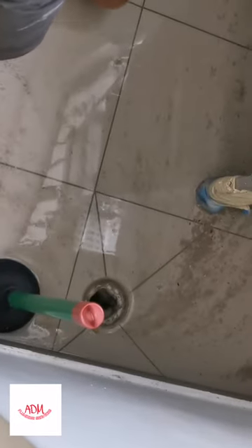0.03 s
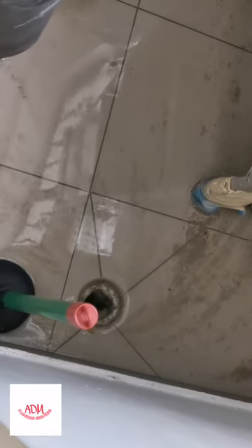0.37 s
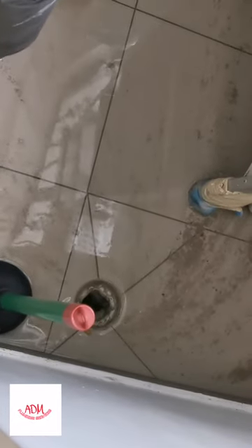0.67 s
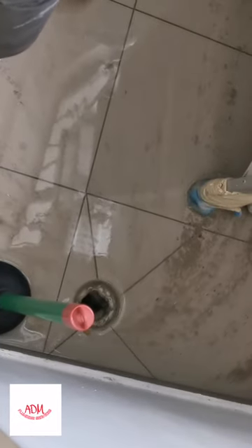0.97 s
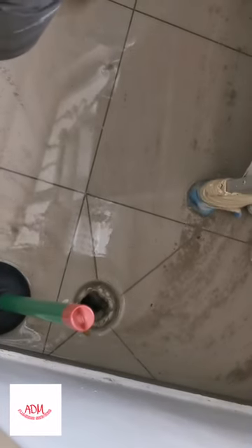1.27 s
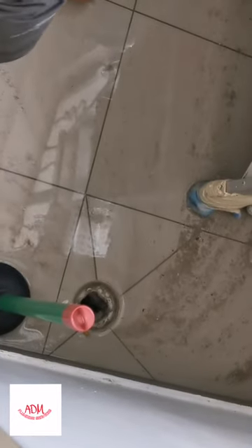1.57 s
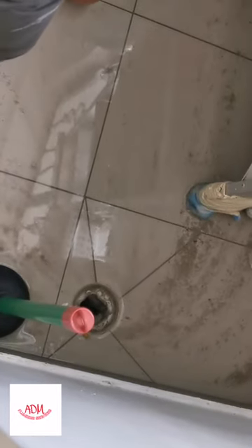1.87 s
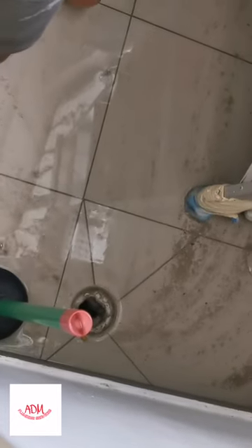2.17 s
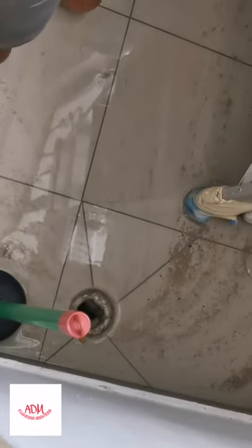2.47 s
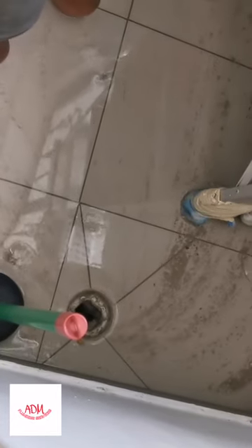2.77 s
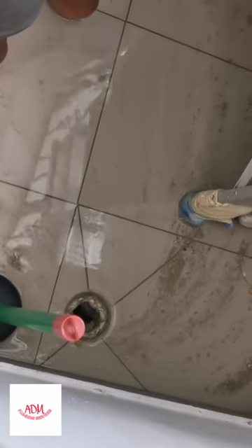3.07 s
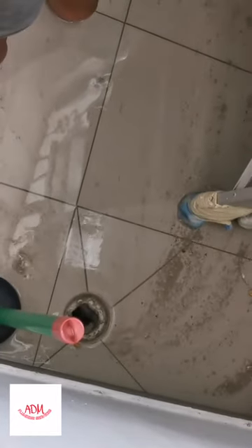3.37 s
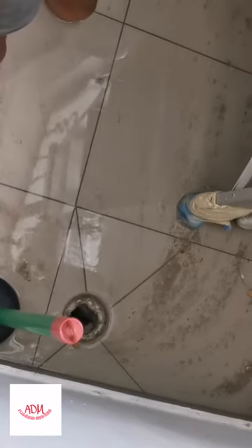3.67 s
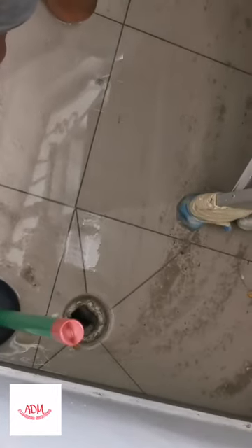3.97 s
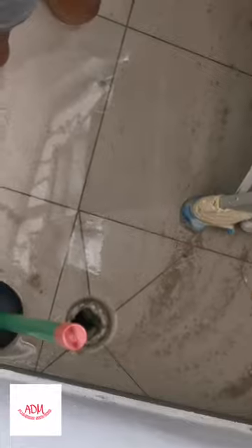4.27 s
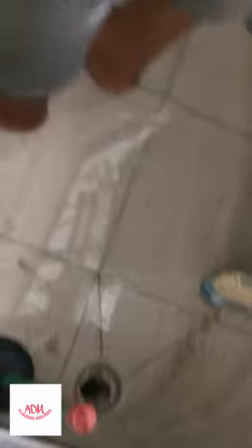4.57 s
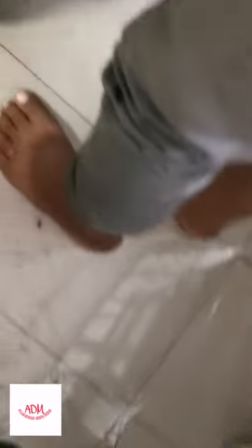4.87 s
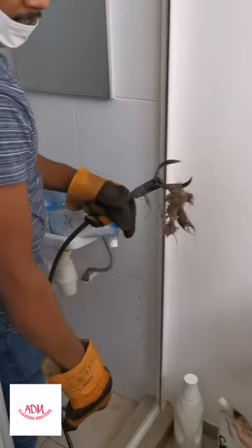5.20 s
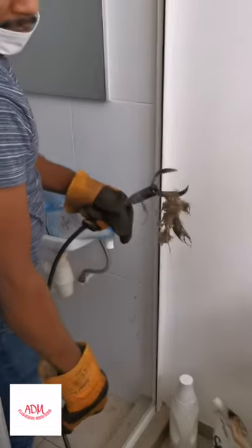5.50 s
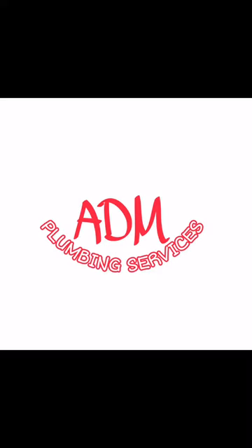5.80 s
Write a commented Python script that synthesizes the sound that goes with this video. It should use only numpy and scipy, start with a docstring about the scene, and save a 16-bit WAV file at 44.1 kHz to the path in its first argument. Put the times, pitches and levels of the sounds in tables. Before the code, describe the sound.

Rough, hollow grinding with rattles, thumps and metallic clinks from a cable turning in a bathroom drain, ending abruptly in a pop.

```python
"""A rough grinding with hard chatter: a drain cleaning machine spins its steel cable in a waste pipe.
Friction on most turns and impacts on the wall excite the pipe's resonances as rubs, rattles and thumps.
The coils scrape, clink, squeak and scuff in a small tiled bathroom, over a motor's drone, rumble and hiss.
The sound cuts off dead just after a pop; after a silence, a moment of quiet room ends on a second pop."""
import sys
import numpy as np
from scipy import signal
from scipy.fft import rfft, irfft
from scipy.io import wavfile

SR = 44100
rng = np.random.default_rng(int(sys.argv[2]) if len(sys.argv) > 2 else 0)


def materialize(psi):
    """Save the field psi as 16-bit PCM at rate SR to the path in sys.argv[1].

    A 1-D psi becomes a single channel; in a 2-D psi each row is a channel.
    """
    bounded = np.clip(np.atleast_2d(psi).T, -1, 1)
    quanta = np.round(bounded * 32767).astype(np.int16)
    wavfile.write(sys.argv[1], SR, quanta)


N = 261954
TIME = np.arange(N) / SR
FREQS = np.fft.rfftfreq(N, 1 / SR)

# hard impacts of the cable on the pipe wall: peak t/s, relative level/dB, f/Hz, length/s
WALL_IMPACTS = [(0.061, -24.5, 608, 0.018), (0.092, -25.5, 572, 0.014), (0.145, -20, 620, 0.012),
                (0.199, -12.5, 630, 0.0088), (0.239, -19.5, 580, 0.007), (0.284, -15.5, 610, 0.0049),
                (0.326, -15, 616, 0.01), (0.375, -14.5, 594, 0.0062), (0.41, -26, 615, 0.0053),
                (0.461, -18, 583, 0.0068), (0.499, -23, 610, 0.014), (0.529, -22.5, 644, 0.0034),
                (0.56, -17, 614, 0.008), (0.588, -15.5, 602, 0.0087), (0.617, -18, 606, 0.0053),
                (0.632, -20.5, 560, 0.0064), (0.676, -16.5, 610, 0.01), (0.684, -25.5, 995, 0.01),
                (0.73, -12.5, 627, 0.01), (0.781, -19.5, 597, .005), (0.811, -26.5, 593, 0.0055),
                (0.987, -23.5, 580, 0.0082), (1.089, -19, 610, 0.0084), (1.232, -21.5, 555, 0.01),
                (1.316, -23.5, 565, 0.011), (1.417, -21, 613, 0.012), (1.457, -17, 564, 0.004),
                (1.493, -19.5, 593, 0.011), (1.529, -21.5, 583, 0.0072), (1.555, -22, 613, 0.02),
                (1.629, -14, 603, 0.01), (1.663, -17, 602, 0.017), (1.696, -20, 593, 0.013),
                (1.814, -19, 595, 0.0096), (1.85, -20.5, 610, 0.015), (1.998, -17.5, 607, 0.019),
                (2.022, -18, 592, 0.0087), (2.082, -19, 625, 0.014), (2.111, -19.5, 623, 0.0042),
                (2.147, -21.5, 633, 0.016), (2.168, -20.5, 614, 0.0046), (2.202, -22.5, 586, 0.021),
                (2.325, -17, 615, 0.007), (2.37, -22.5, 612, 0.014), (2.425, -19.5, 600, 0.0035),
                (2.491, -21.5, 616, 0.016), (2.552, -22, 576, 0.0098), (2.589, -23.5, 604, 0.0088),
                (2.64, -31.5, 612, 0.02), (2.694, -21, 620, .005), (2.771, -24.5, 594, 0.012),
                (2.812, -18, 617, 0.01), (2.853, -18, 633, 0.012), (2.878, -21, 600, .005),
                (2.934, -14, 585, 0.0065), (3, -22, 646, 0.014), (3.147, -18, 619, 0.011),
                (3.172, -28, 965, 0.0086), (3.221, -21.5, 578, 0.013), (3.286, -21, 611, 0.014),
                (3.331, -15, 630, 0.026), (3.353, -28.5, 985, 0.015), (3.502, -21.5, 612, 0.017),
                (3.522, -28, 910, 0.0076), (3.528, -20, 610, 0.005), (3.554, -20, 635, 0.0062),
                (3.57, -25, 720, 0.0057), (3.73, -26, 970, 0.0067), (3.733, -22, 610, 0.0058),
                (3.834, -24.5, 637, 0.0084), (3.895, -32, 974, 0.018), (3.921, -18.5, 593, 0.0085),
                (3.947, -24, 590, 0.0095), (3.983, -20, 600, 0.0088), (4.061, -19.5, 597, 0.0093),
                (4.204, -24.5, 600, 0.022), (4.265, -17.5, 613, 0.0087), (4.293, -20, 589, 0.0043),
                (4.375, -31.5, 625, 0.013), (4.39, -26.5, 961, 0.013), (4.414, -22.5, 640, 0.0083),
                (4.518, -27, 996, 0.0081), (4.582, -24, 591, 0.018), (4.702, -31.5, 1047, 0.016),
                (4.751, -24, 754, 0.0064), (4.782, -27.5, 1037, 0.018), (4.822, -26, 608, .01),
                (4.842, -22.5, 589, .006)]
# spectrum of scraping steel: f/Hz, relative level/dB
SCRAPE_SPECTRUM = [(100, -20), (300, -8), (500, 5), (850, 5.5), (1220, -4), (1450, -0.9), (2100, -2.5),
                   (2650, -5.5), (3000, -6.8), (3550, -14.5), (4300, -16.5), (5100, -22.5), (6800, -27.5),
                   (15000, -30.5)]
# the two stretches that sound: start t/s, end t/s
AUDIBLE_SPANS = [(0, 5.0797), (5.592, 5.7903)]


def grinding():
    """Forced vibration: grains of friction drive the pipe's modes, deep down and near its mouth."""
    # resonances of the pipe: f/Hz, bandwidth/Hz, relative level/dB
    pipe_modes = [(123, 4.4, -19.5), (132.5, 2.9, -14.5), (181.6, 4.4, -25.5), (229.8, 6.7, -1),
                  (298, 20, -3.5), (368, 4.8, -1.5), (464.5, 37.7, 6), (580, 68, 4.5), (592, 3.1, -5),
                  (622, 42, 8), (711, 28, 5.5), (780, 90, -42.5), (930.2, 12, 6), (999, 20, 5.5),
                  (954, 34, -1), (1364, 140, -7)]
    drag, _, deep_rub, mouth_rub = friction()
    # the pipe lets little treble out; from far down only its low modes arrive
    pipe = ringing(pipe_modes) / (1 + (FREQS / 1700) ** 6)
    low = 1 / (1 + (FREQS / 670) ** 16)
    deep = shape(grains(per_s=4000, spread_db=-2), pipe * low)
    deep *= np.hypot(drag, deep_rub) * amp(wander(42))
    mouth = shape(grains(per_s=4000, spread_db=-.6), pipe * (1 - low))
    mouth *= np.hypot(amp(-6) * drag, mouth_rub) * amp(.25 * wander(33))
    return contact() * deep + mouth


def friction():
    """Friction follows normal force: envelopes of steady drag and of rubs, about six a second."""
    # steady drag: t/s, level in the pipe/dB, level at the open coils/dB
    drag_levels = [(0, -28.5, -33), (.7, -34.5, -34.5), (.85, -37, -34), (1.3, -29, -32), (2.0, -28.5, -33),
                   (2.9, -27.5, -32.5), (3.15, -32.5, -35), (3.45, -45, -35.5), (3.6, -33, -37.5),
                   (4.05, -29, -35.5), (4.6, -28.5, -35), (5.0, -31, -35), (5.08, -42, -39.5)]
    # the cable leans on the wall: peak t/s, level deep down/dB, level at the mouth/dB, length/s
    rubs = [(0.048, -26.5, -26.5, 0.008), (0.216, -21.5, -29, 0.038), (0.395, -31, -25.5, 0.022),
            (0.557, -27.5, -28, 0.073), (0.71, -23.5, -30.5, 0.057), (0.933, -25, -32.5, 0.039),
            (1.083, -23, -33.5, 0.029), (1.3, -35.5, -31.5, 0.04), (1.444, -27, -31, 0.086),
            (1.638, -24.5, -26.5, 0.0099), (1.828, -35.5, -32, 0.049), (1.977, -22, -26, 0.028),
            (2.12, -26.5, -31, 0.099), (2.36, -33.5, -27.5, 0.069), (2.606, -16, -26, 0.012),
            (2.671, -20, -26, 0.029), (2.83, -30, -29.5, 0.038), (3.003, -23, -28, 0.052),
            (3.155, -21.5, -32, 0.025), (3.3, -21.5, -30, 0.082), (3.535, -23, -28, 0.069),
            (3.703, -47, -30, 0.12), (3.914, -20.5, -30.5, 0.043), (3.959, -23.5, -24, 0.029),
            (4.13, -61, -31.5, 0.072), (4.35, -24, -31.5, 0.075), (4.404, -34, -30.5, 0.054),
            (4.53, -35, -29.5, 0.072), (4.748, -22, -27.5, 0.065), (4.829, -23, -36.5, 0.026),
            (4.985, -35, -29.5, 0.048)]
    times, *levels = np.transpose(drag_levels)
    drag, scrape = (amp(np.interp(TIME, times, level)) for level in levels)
    power = sum((amp([[deep_db], [mouth_db]]) * swell(TIME[::16] - s, length, length)) ** 2
                for s, deep_db, mouth_db, length in rubs)
    deep_rub, mouth_rub = np.sqrt(power).repeat(16, axis=1)[:, :N]
    return drag, scrape, deep_rub, mouth_rub


def contact():
    """Rebound unloads the wall: a gain that dips around each hard impact."""
    bounce_db = -4
    bouncing = sum(np.exp(-((TIME[::16] - s) / (2 * length)) ** 2) for s, _, _, length in WALL_IMPACTS)
    return amp(bounce_db * np.minimum(bouncing, 1)).repeat(16)[:N]


def scraping():
    """Sliding friction: coils in the open radiate broadband grit and twangs, louder at each rub."""
    _, scrape, _, mouth_rub = friction()
    grit = shape(grains(per_s=14000, spread_db=1.25), amp(read(SCRAPE_SPECTRUM)))
    coils = grit + amp(-12) * twangs()
    coils *= np.hypot(scrape, amp(-8) * mouth_rub) * amp(1.3 * wander(30))
    return bathroom(coils, wet_db=-6, t60=.19)


def twangs():
    """Free vibration: single turns of the coil catch and ring for an instant; the higher, the fainter."""
    middle_hz, spread_octaves, db_per_octave, spread_db, length_s = 1700, .25, -5, 1.2, .005
    rows = []
    for s, strength, pitch in scattered(count=440):
        octaves = spread_octaves * pitch
        rows.append((s, spread_db * strength + db_per_octave * octaves, middle_hz * 2 ** octaves, length_s))
    return unit(bursts(rows, attack=.4, rough=.15, lead=1.2))


def rattles():
    """Impact excitation: hard and light hits sound near the pipe's strongest resonance, with grit."""
    # light chatter between the hard impacts: t/s, relative level/dB
    chatter_levels = [(0, -30), (.6, -28), (.88, -29), (1.3, -28), (2.7, -28), (3.2, -30), (3.75, -32),
                      (4.3, -32), (5.0, -34)]
    mean_hz, spread_hz, spread_db, length_s = 607, 23, 2.5, .01
    light = [(s, np.interp(s, *np.transpose(chatter_levels)) + spread_db * strength,
              mean_hz + spread_hz * pitch, length_s) for s, strength, pitch in scattered(count=72)]
    knocks = amp(-1) * bursts(WALL_IMPACTS, attack=.8, rough=.14, lead=.4)
    chatter = contact() * bursts(light, attack=.65, rough=.3, lead=.4)
    grit = amp(-24.5) * noise(SCRAPE_SPECTRUM) * force(WALL_IMPACTS + light, rise=.006, fall=.012)
    return bathroom(knocks + chatter + grit, wet_db=-12.5, t60=.3)


def thumps():
    """Superposition: the whipping cable drives several pipe modes at once, which beat and ring on."""
    # dull blows: peak t/s, relative level/dB, tilt toward the upper modes/dB, length/s
    blows = [(0.242, -28, 1, 0.017), (0.629, -36.5, -6, 0.016), (1.123, -29.5, 4, 0.018),
             (1.465, -19, 2.5, 0.011), (1.528, -31, -2, 0.0076), (1.816, -21, 0, .013),
             (1.909, -22, 0.5, 0.009), (2.006, -27.5, -6, 0.0092), (2.162, -26.5, -2.5, .012),
             (2.345, -21.5, 4, 0.017), (2.511, -24, 2, 0.015), (2.61, -32, -6.5, 0.012),
             (2.86, -18.5, 2, 0.0077), (2.948, -27.5, -2.5, 0.012), (3.111, -22.5, 0.5, 0.0083),
             (3.548, -24, 6, 0.014), (4.244, -24.5, 1.5, .013), (4.394, -36.5, -9, .012),
             (4.948, -32, -2.5, 0.015)]
    # pipe modes that a blow drives: f/Hz, bandwidth/Hz, relative level/dB
    boom_modes = [(222, 7, -1), (282, 20, -2), (373, 16, -12), (455, 23, -10), (1030, 32, -13)]
    driven = [(s, db + mode_db + (tilt_db if k else -tilt_db) + rng.standard_normal(), hz, length)
              for s, db, tilt_db, length in blows for k, (hz, _, mode_db) in enumerate(boom_modes)]
    thud = bursts(driven, attack=1.4, rough=.25, lead=.05)
    ring = struck(blows, boom_modes, lag=.012, vary_db=2, detune=.015)
    return amp(-4.5) * thud + amp(-6.5) * ring


def clinks():
    """Brief contact excites high modes: coils strike metal with a ping, clack, ring and bright splash."""
    # strikes, at relative levels: peak t/s, level/dB, ping f/Hz, splash level/dB, ping length/s
    strikes = [(0.186, -36, 2870, -62.5, 0.0046), (0.376, -37, 3350, -65.5, 0.0044),
               (0.498, -41, 3030, -64.5, 0.0098), (0.532, -42.5, 3030, -58, .004),
               (0.55, -41.5, 3350, -69, 0.0044), (0.614, -32.5, 2930, -50, 0.0036),
               (0.671, -31, 3280, -46.5, 0.0047), (1.316, -36.5, 3000, -48.5, .005),
               (1.377, -39, 2980, -60, .006), (1.453, -39.5, 2895, -65, 0.0043),
               (1.491, -38.5, 2980, -47.5, .005), (1.55, -37, 2940, -49, 0.0044),
               (1.838, -39, 3300, -58, 0.0085), (2.013, -33, 3290, -44, 0.0084),
               (2.071, -34, 3360, -47.5, 0.0064), (2.138, -41, 3370, -63, .004),
               (2.165, -36, 2920, -60, 0.0028), (2.184, -37.5, 3200, -53, .004),
               (2.317, -39.5, 2760, -49, .004), (2.363, -36.5, 3270, -45, 0.008),
               (2.413, -42.5, 3015, -66, .004), (2.528, -36, 3330, -52, 0.003),
               (2.59, -39, 2800, -57, 0.005), (2.646, -43, 3320, -47.5, 0.0049),
               (2.695, -36, 2970, -53.5, .005), (2.761, -35, 3000, -58, .007),
               (2.872, -35.5, 2960, -53.5, 0.0037), (2.93, -34.5, 2820, -60.5, .006),
               (2.989, -40, 3460, -50, 0.0059), (3.276, -36.5, 2760, -55.5, 0.0061),
               (3.543, -35.5, 2830, -48, 0.0055), (3.575, -35.5, 3020, -52, 0.0038),
               (3.665, -37.5, 3320, -47.5, 0.0037), (3.908, -36, 2810, -67, .005),
               (3.948, -28.5, 3310, -38.5, .005), (4.337, -29.5, 3270, -44.5, 0.0072),
               (4.368, -35, 3000, -49, .004), (4.411, -37.5, 2830, -50.5, 0.012),
               (4.854, -44, 2790, -71, .005), (5.004, -43.5, 3120, -55, 0.0031)]
    # modes of the steel coil: f/Hz, bandwidth/Hz, relative level/dB
    steel_modes = [(2090, 60, -5), (2853, 45, 0), (2990, 50, -2), (3285, 40, 0), (3375, 36, -3),
                   (3690, 45, -11), (3950, 55, -10), (4603, 80, -17), (5500, 90, -17)]
    # spectrum of the dry clack: f/Hz, relative level/dB
    clack_spectrum = [(1000, -10), (1900, 1), (2550, -4), (2800, 2), (3020, 3), (3150, -6), (3270, 4),
                      (3400, 2), (3540, -9), (3950, -5.5), (4400, -13), (5000, -30), (9000, -41)]
    # spectrum of the bright splash: f/Hz, relative level/dB
    splash_spectrum = [(1500, -23.5), (3000, 10.5), (4200, 2), (5100, -7), (6800, -6), (10500, -8),
                       (15000, -20.5)]
    # faint strikes are added all along
    rows = strikes + [(s, -43 + 2 * strength, 3080 + 190 * pitch, -65 + 2 * strength, .004)
                      for s, strength, pitch in scattered(count=40)]
    ping = bursts([(s, db, hz, length) for s, db, hz, _, length in rows], attack=.3, rough=.2, lead=1.2)
    clack = noise(clack_spectrum) * force(rows, rise=.002, fall=.009)
    ring = struck(rows, steel_modes, lag=.002, vary_db=4, detune=.008)
    splash = noise(splash_spectrum) * force([(s, db) for s, _, _, db, _ in rows], rise=.004, fall=.018)
    direct = amp(-2) * ping + amp(.5) * clack + amp(-4.5) * ring + amp(8) * splash
    return bathroom(direct, wet_db=-7, t60=.35)


def squeaks():
    """Stick-slip: steel catches on steel, and one mode of the coil sings briefly."""
    # slips: peak t/s, level/dB, f/Hz, length/s
    slips = [(1.12, -43, 2550, .012), (3.025, -45, 3390, .018), (3.165, -41.5, 2853, .025),
             (3.338, -38.5, 2853, .02)]
    return bursts(slips, attack=.9, rough=.15, lead=.8)


def scuffs():
    """Friction noise: coils slide over a hard edge in a bright scrape that catches and trails off."""
    # slides: peak t/s, relative level/dB, decay time/s
    slides = [(4.14, -53, .018), (4.59, -52, .018), (4.693, -48, .01), (4.746, -39.5, .016),
              (4.78, -46.5, .02), (4.965, -48.5, .012), (5.0, -49, .016)]
    # spectrum of steel on the edge: f/Hz, relative level/dB
    edge_spectrum = [(2000, -14.5), (2870, 12.5), (3250, 2.5), (4200, 6.5), (4900, -6.5), (5600, 2),
                     (6400, -8), (9000, -20), (15000, -26)]
    envelope = sum(amp(db) * swell(TIME - s, .006, decay) for s, db, decay in slides)
    grit = shape(grains(per_s=11000, spread_db=0), amp(read(edge_spectrum)))
    return bathroom(amp(5) * grit * envelope, wet_db=-13, t60=.21)


def pops():
    """Damped oscillation: a sudden push of air, mainly at the right microphone, swings back and dies."""
    # pressure pulses: t/s, level/dB, period/s, decay time/s, left relative to right/dB
    pulses = [(5.046, -2.5, 0.013, 0.0063, -14), (5.7805, -4.5, 0.02, 0.0043, -17)]
    out = np.zeros((2, N))
    for s, db, period, decay, left_db in pulses:
        t = np.maximum(TIME - s, 0)
        front = 1 - np.exp(-(t / .00024) ** 2)
        push = np.exp(-t / decay) * np.cos(2 * np.pi * t / period + .73)
        snap = 1.27 * np.exp(-t / .00022)
        out += amp(db) * front * np.array([amp(left_db) * push, push + snap])
    return out


def motor():
    """Modulation: the motor's drone wavers in pitch, grows under load and judders as the load shifts."""
    # drone under load: t/s, level/dB
    load_levels = [(0, -55.5), (1.0, -55.5), (1.45, -48), (1.6, -42.5), (2.0, -45), (2.33, -42),
                   (2.45, -58), (3.2, -55.5), (5.08, -57)]
    drone_hz = 147
    cycles = np.cumsum(drone_hz * (1 + .04 * wander(8.5))) / SR
    judder = .7 + .7 * wander(16) + .25 * wander(60)
    load = amp(np.interp(TIME, *np.transpose(load_levels)))
    return np.sqrt(2) * np.sin(2 * np.pi * cycles) * judder * load


def rumble_and_hiss():
    """Band-limited noise: a slowly swelling rumble and a thin, nearly steady hiss."""
    # course of the rumble: t/s, level/dB
    rumble_levels = [(0, -41.5), (.9, -45), (1.4, -37.5), (2.2, -45.5), (2.8, -36.5), (3.4, -43),
                     (4.2, -42), (5.08, -38.5)]
    # spectrum of the rumble: f/Hz, relative level/dB
    rumble_spectrum = [(10, -14), (25, -10), (40, -4), (70, -3.5), (95, -20.5), (200, 3), (500, -3),
                       (2000, -74.5)]
    # spectrum of the hiss: f/Hz, relative level/dB
    hiss_spectrum = [(7700, -31.5), (8700, -7.5), (10000, 5.5), (10800, 11), (11600, 0), (13300, -6.5),
                     (14100, -15), (15000, -10)]
    rumble = amp(np.interp(TIME, *np.transpose(rumble_levels))) * noise(rumble_spectrum)
    hiss = amp(-51 + wander(22.3)) * noise(hiss_spectrum)
    return rumble + hiss


def quiet_room():
    """Ambient noise floor: faint, steady and mostly bass."""
    # spectrum of the room: f/Hz, relative level/dB
    room_spectrum = [(10, 4), (40, 1), (170, -2), (300, -12), (600, -16.5), (1000, -14.5), (1500, -21),
                     (3000, -28), (4100, -44), (5500, -41), (7500, -60), (10500, -41), (13000, -48),
                     (15000, -52)]
    return amp(-45) * noise(room_spectrum)


def bathroom(x, wet_db, t60):
    """Reverberation: dense reflections from tiled walls fall by 60 dB in t60 seconds."""
    taps = rng.standard_normal((2, N)) * (rng.random((2, N)) < 3000 / SR)
    tail = pair(taps * amp(-60 * TIME / t60) * (TIME > .005))[:, :SR // 2]
    tail /= np.linalg.norm(tail, axis=1, keepdims=True)
    return x + amp(wet_db) * signal.fftconvolve(x, tail, axes=1)[:, :N]


def bursts(rows, attack, rough, lead):
    """Driven resonance: each contact pumps a short tone; the left channel leads by `lead` radians."""
    out = np.zeros(N, complex)
    for s, db, hz, length in rows:
        near = slice(max(int((s - 3 * length) * SR), 0), int((s + 8 * length) * SR))
        t = TIME[near] - s
        out[near] += amp(db) * swell(t, attack * length, length) * np.exp(2j * np.pi * hz * t)
    out *= 1 + rough * (wander(140) + 1j * wander(140))
    # the contact point slides, so the phase drifts
    out *= np.exp(2j * wander(2.13))
    return np.sqrt(2) * np.array([out * np.exp(1j * lead), out]).real


def struck(rows, modes, lag, vary_db, detune):
    """Modal decay: each blow rings every mode, with random strength and detuning for where it lands."""
    out, t = np.zeros((2, N + SR)), TIME[:SR // 4]
    hz, width, mode_db = np.transpose(modes)[:, :, None]
    for s, db, *_ in rows:
        detuned_hz = hz * (1 + detune * rng.standard_normal(hz.shape))
        rings = amp(mode_db) * np.exp((2j * detuned_hz - width) * np.pi * t) * (1 - np.exp(-t / lag))
        strengths = amp(vary_db * rng.standard_normal(len(modes)))
        phases = np.exp(2j * np.pi * rng.random((2, len(modes))))
        start = max(int((s - lag) * SR), 0)
        out[:, start:start + len(t)] += amp(db) * ((strengths * phases) @ rings).real
    return pair(out[:, :N])


def ringing(modes):
    """Frequency response of damped resonators in parallel."""
    return sum(amp(db) * 1j * FREQS * width / (hz ** 2 - FREQS ** 2 + 1j * FREQS * width)
               for hz, width, db in modes)


def swell(t, rise, fall):
    """Contact envelope: a Gaussian rise to the peak at t = 0, then a near-exponential decay."""
    return np.exp(-(np.minimum(t, 0) / rise) ** 2 - np.hypot(np.maximum(t, 0) / fall, .5) + .5)


def force(rows, rise, fall):
    """Incoherent sum: the envelopes of separate contacts add in power."""
    power = sum((amp(db) * swell(TIME[::16] - s, rise, fall)) ** 2 for s, db, *_ in rows)
    return np.sqrt(power).repeat(16)[:N]


def scattered(count, spin_s=5):
    """Jittered contacts while the cable spins: t/s, random deviates for strength and pitch."""
    late, strength, pitch = rng.standard_normal((count, 3)).T
    times = (np.arange(count) + .5 + .5 * np.tanh(late)) * spin_s / count
    return np.transpose([times, np.clip(strength, -2, 2), pitch])


def grains(per_s, spread_db):
    """Shot noise: tiny contacts of uneven size at random moments."""
    size = amp(spread_db * np.minimum(rng.exponential(1, N), 4)) * (rng.random(N) < per_s / SR)
    return unit(pair(size * rng.standard_normal((2, N))))


def noise(spectrum):
    """Coloured Gaussian noise in two channels, rms 1."""
    return shape(pair(rng.standard_normal((2, N))), amp(read(spectrum)))


def wander(rate_hz):
    """Low-pass random fluctuation, rms 1."""
    return shape(rng.standard_normal(N), np.exp(-(FREQS / rate_hz) ** 2))


def pair(x):
    """Spatial coherence: long waves reach two close microphones alike, short waves do not."""
    # likeness of left and right: f/Hz, correlation
    coherence = [(60, 0.94), (290, 0.97), (640, 0.71), (1400, 0.05), (3000, 0.11), (7000, 0.01)]
    left, other = rfft(x)
    same = read(coherence)
    return irfft([left, same * left + np.sqrt(1 - same ** 2) * other], N)


def shape(x, gain):
    """Linear filtering by a gain per frequency, to rms 1."""
    return unit(irfft(rfft(x) * gain, N))


def read(points):
    """Interpolation of a table on a log-frequency axis."""
    hz, value = np.transpose(points)
    return np.interp(np.log(FREQS + 1), np.log(hz + 1), value)


def unit(x):
    """Normalisation to rms 1."""
    return x / np.sqrt(np.mean(x ** 2) + 1e-20)


def amp(db):
    """Decibels to amplitude ratio."""
    return 10 ** (np.asarray(db) / 20)


def scene():
    """Superposition: the machine, then the quiet room, panned at constant power, plus the pops."""
    # level difference between the channels: f/Hz, left minus right/dB
    balance = [(60, -3.5), (200, -3), (400, -3.5), (600, .5), (1030, 2), (1450, -11.5), (2100, 0),
               (2550, -5.5), (3350, 2.5), (4700, -10.5), (5500, 1), (7000, -5), (10500, 22.5), (15000, 19)]
    machine = grinding() + scraping() + rattles() + thumps() + clinks() + squeaks() + scuffs()
    machine += motor() + rumble_and_hiss()
    room_start_s = AUDIBLE_SPANS[1][0]
    sound = np.where(TIME < room_start_s, machine, quiet_room())
    left = amp(read(balance))
    pan = np.array([left, np.ones_like(left)]) * np.sqrt(2 / (1 + left ** 2))
    return irfft(rfft(sound) * pan, N) + pops()


def record(dry):
    """Filtering and gating: a narrow treble dip near 7.6 kHz, hard cuts to silence, then a band limit."""
    # gain curve with a narrow dip in the treble: f/Hz, level/dB
    treble_dip = [(6500, 2.5), (7200, -1.5), (7600, -10.5), (8100, -3.5), (9000, -1)]
    gate = sum((TIME >= start) & (TIME < end) for start, end in AUDIBLE_SPANS)
    heard = irfft(rfft(dry) * amp(read(treble_dip)), N) * gate
    band_limit = signal.firwin(511, cutoff=15400, window=("kaiser", 9), fs=SR)
    return signal.oaconvolve(heard, band_limit[None], "same")


dry = scene()
out = record(dry)
materialize(out)
```